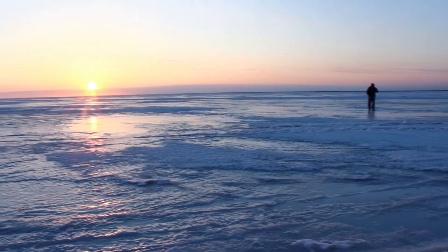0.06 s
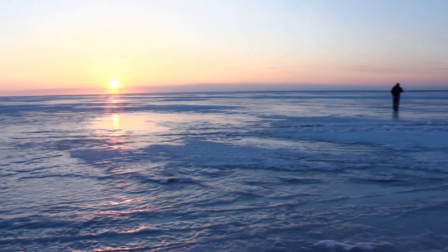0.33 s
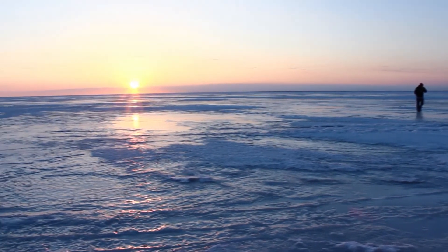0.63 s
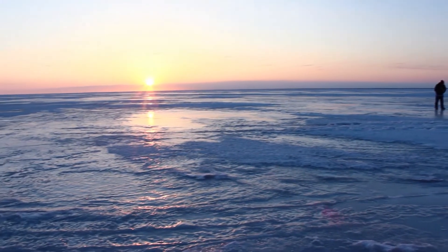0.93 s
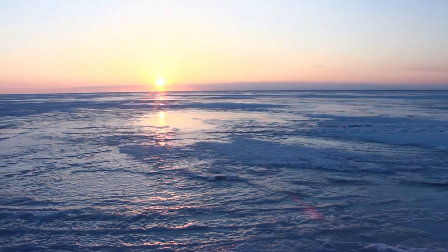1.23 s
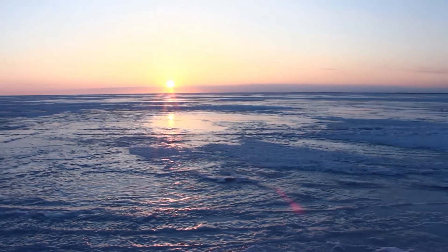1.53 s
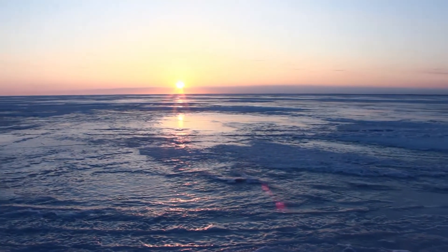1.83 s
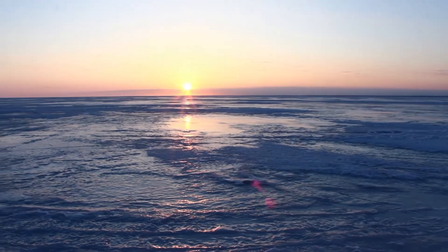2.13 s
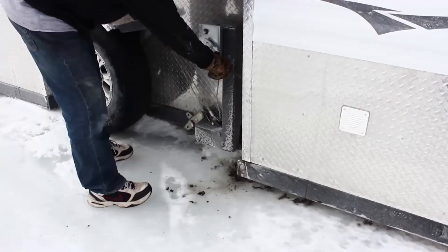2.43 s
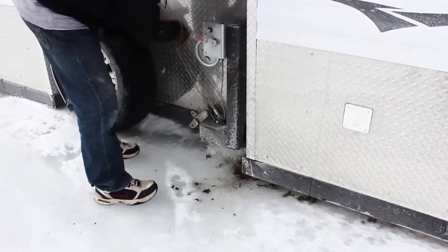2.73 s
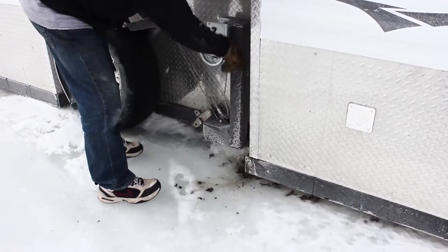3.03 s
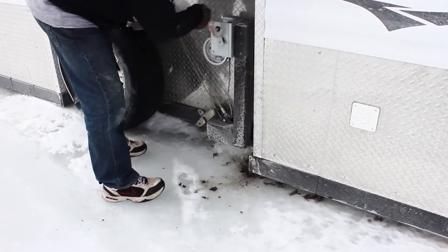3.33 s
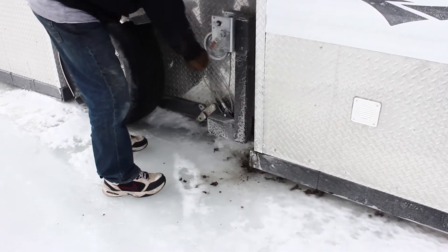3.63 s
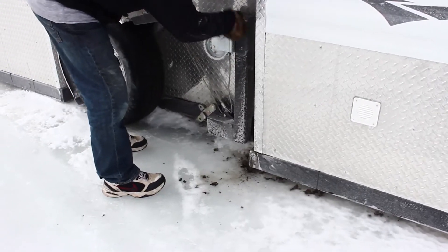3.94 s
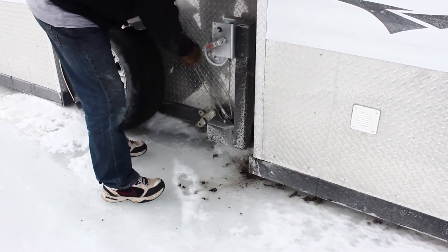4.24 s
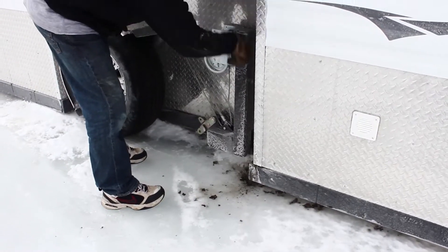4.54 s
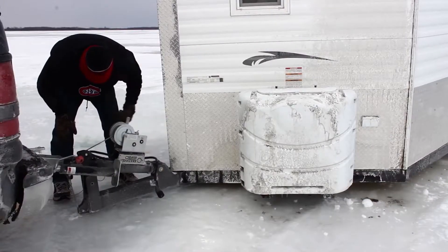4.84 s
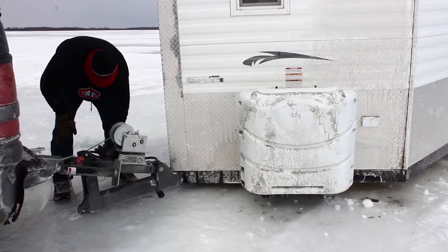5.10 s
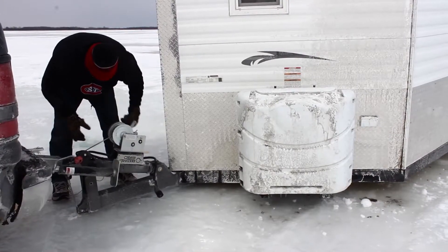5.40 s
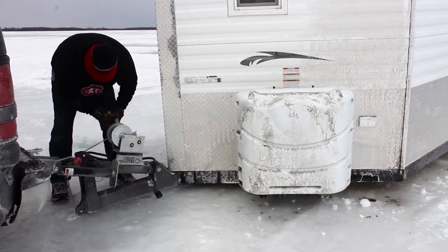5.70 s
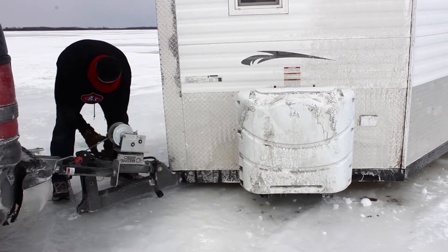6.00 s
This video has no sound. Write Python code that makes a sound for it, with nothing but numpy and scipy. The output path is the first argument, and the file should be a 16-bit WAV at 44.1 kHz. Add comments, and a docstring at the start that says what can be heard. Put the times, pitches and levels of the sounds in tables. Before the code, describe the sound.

After a few faint crunches and knocks outdoors, a hand winch and then a hitch jack rattle loudly with rapid, surging ratchet clicks.

```python
"""A few soft steps and knocks on a frozen lake open the scene. Then the winch of a shelter's wheel lift
is cranked hard, and after it the hitch jack. On each, a pawl drops over the ratchet teeth, faster and
slower with every turn of the handle, and rings the steel housing. The gears rumble in the frame under
the load, and the jack squeaks as it slows."""
import sys
import numpy as np
from scipy import signal
from scipy.fft import rfft, irfft
from scipy.io import wavfile
from scipy.ndimage import uniform_filter1d

SR = 44100
rng = np.random.default_rng(int(sys.argv[2]) if len(sys.argv) > 2 else 0)


def to_wav(s):
    """Save 16-bit WAV."""
    ch = np.atleast_2d(s).T  # columns
    pcm = np.round(np.clip(ch, -1, 1) * 32767)  # PCM
    wavfile.write(sys.argv[1], SR, pcm.astype(np.int16))


N = 276151


def undb(db):
    """Decibels to gain."""
    return 10 ** (np.asarray(db) / 20)


def curve(table, column=1):
    """One column of a table, joined by straight lines in time."""
    rows = np.array(table, float)
    return np.interp(np.arange(N) / SR, rows[:, 0], rows[:, column])


def swells(table, column=2):
    """Gain of bell-shaped swells; each row starts with centre and half length in seconds."""
    t = np.arange(N) / SR
    powers = (undb(row[column]) ** 2 * np.exp(-2 * ((t - row[0]) / row[1]) ** 2) for row in table)
    return np.sqrt(sum(powers))


def add(out, s, sound):
    """Mix a short sound in at s seconds."""
    i = int(np.clip(round(s * SR), 0, N - 1))
    out[i:i + len(sound)] += sound[:N - i]


def body(x, colour, modes=(), ripple_db=0, size=8192):
    """Ring x through a broad EQ, main resonances and a ripple of weak ones, at unit power gain."""
    f = np.arange(size // 2 + 1) * SR / size
    points = np.array(colour, float)
    colour_db = np.interp(np.log(f + 1), np.log(points[:, 0]), points[:, 1])
    ripple = signal.fftconvolve(rng.standard_normal(len(f)), np.hanning(25), "same")
    power = undb(colour_db + ripple_db * ripple / np.std(ripple)) ** 2
    for hz, half_width, db in modes:
        power += undb(db) ** 2 / (1 + ((f - hz) / half_width) ** 2) ** 2
    # folding the cepstrum puts the ring after the hit
    cepstrum = irfft(np.log(power / power.mean()) / 2)
    cepstrum[1:size // 2] *= 2
    cepstrum[size // 2 + 1:] = 0
    return signal.fftconvolve(x, irfft(np.exp(rfft(cepstrum))))[:N]


def grit(per_s, spread_db):
    """Dense tiny impacts of uneven size, rms 1."""
    impacts = rng.standard_normal(N) * (rng.random(N) < per_s / SR)
    impacts *= undb(spread_db * rng.standard_normal(N))
    return impacts / np.std(impacts)


def chatter(envelope, passes=0):
    """A unit-energy burst of tiny rebounds under an envelope; each pass evens out its spectrum."""
    burst = rng.standard_normal(len(envelope)) * envelope
    for _ in range(passes):
        burst *= envelope / np.sqrt(uniform_filter1d(burst ** 2, size=64) + 1e-12)
        spectrum = rfft(burst, 2 * len(envelope))
        burst = irfft(spectrum / (np.abs(spectrum) + 1e-12))[:len(envelope)]
    return burst / np.linalg.norm(burst)


def teeth(speed):
    """Times at which a pawl drops: one for every tooth that the wheel carries past it."""
    t = np.arange(int(speed[0][0] * SR), int(speed[-1][0] * SR)) / SR
    passed = np.cumsum(np.interp(t, *np.transpose(speed))) / SR
    return np.interp(np.arange(int(passed[-1]) + 1), passed, t)


# EQ of the murmur and of the hiss. Each row: frequency in Hz, relative level in dB.
MURMUR_COLOUR = [(20, -28.5), (45, -9), (100, -1), (180, -0.5), (290, 2), (400, -1.5), (500, -1.5),
                 (680, -11), (2000, -18.5), (8000, -66)]
HISS_COLOUR = [(1000, 8), (5000, -1.5), (9000, -3), (15500, -4.5)]
# Fader ride of the bed, dipping briefly after the first clank.
# Each row: time in seconds, murmur and hiss in dB before their trims.
AIR_LEVELS = [(0, -41.5, -53), (.14, -50.5, -49.5), (.54, -39.5, -52), (.9, -47, -49), (1.35, -42, -50),
              (2.08, -51, -53.5), (2.26, -41, -51), (2.305, -47, -60), (2.38, -56, -58),
              (2.48, -48.5, -52.5)]

def lake_air(murmur_trim_db=1, hiss_trim_db=-1):
    """The bed: a low murmur of the open lake and a smooth hiss."""
    murmur = body(rng.standard_normal(N), MURMUR_COLOUR) * undb(curve(AIR_LEVELS) + murmur_trim_db)
    hiss = body(rng.standard_normal(N), HISS_COLOUR) * undb(curve(AIR_LEVELS, column=2) + hiss_trim_db)
    return murmur + hiss


# EQ of the dull rustle and the bright swish. Each row: frequency in Hz, relative level in dB.
RUSTLE_COLOUR = [(200, -26.5), (550, 0.5), (800, -2.5), (1100, -2.5), (1600, -3), (2500, -13), (4500, -18),
                 (15000, -44.5)]
SWISH_COLOUR = [(800, -36.5), (2000, -5), (3500, -2), (4800, -13), (6500, -25.5), (15000, -31)]
# Peaks in the swish. Each row: frequency and half-width in Hz, relative level in dB.
SWISH_MODES = [(2200, 220, 4), (2750, 220, -0.5), (3180, 190, -1), (4290, 99, -2.8)]
# Scuffing moves. Each row: centre and half length in seconds, rustle and swish in dB.
SCUFFS = [(0.015, 0.071, -42.5, -42.5), (.2, 0.29, -48, -60), (.6, .15, -43.5, -51), (.76, 0.087, -47, -52),
          (.95, 0.047, -37.5, -48), (1.07, 0.068, -39, -42.5), (1.165, 0.042, -38, -47),
          (1.29, 0.08, -45.5, -56), (1.62, 0.25, -54.5, -52), (1.9, 0.17, -69, -53),
          (2.18, 0.041, -42, -53), (2.52, 0.061, -49, -53)]

def scuffs(rustle_floor_db=-62, swish_floor_db=-61.5):
    """Shoes and clothes rub in grainy swells over a faint steady floor."""
    rustle = body(grit(4000, 1.5), RUSTLE_COLOUR)
    swish = body(grit(8700, 1.6), SWISH_COLOUR, SWISH_MODES)
    return (rustle * np.hypot(swells(SCUFFS), undb(rustle_floor_db))
            + swish * np.hypot(swells(SCUFFS, column=3), undb(swish_floor_db)))


# EQ of the crunch. Each row: frequency in Hz, relative level in dB.
CRUNCH_COLOUR = [(150, -42), (500, 7.5), (1100, 3.5), (2000, 2.5), (3300, -2), (5000, -15.5), (9000, -26),
                 (15000, -36)]
# Steps and knocks. Each row: start in seconds, thud level in dB, thud pitch in Hz,
# thud decay in seconds, crunch level in dB, crunch decay in seconds.
STEPS = [(0.3113, -14, 425, 0.0043, -27, 0.0023), (0.3145, -7, 294, 0.0024, -23, 0.003),
         (0.418, -32, 243, 0.011, -57, .009), (.615, -34, 507, .008, -35, .01),
         (.714, -21.5, 570, .0054, -40, .008), (0.729, -25, 322, 0.014, -32.5, 0.013),
         (0.83, -22, 203, 0.0046, -33.5, 0.0076), (0.9645, -14.5, 360, 0.013, -6.5, 0.0038),
         (1.078, -23, 196, 0.006, -22, 0.0085), (1.104, -28, 454, .0073, -20.5, 0.0048),
         (1.2355, -34, 157, 0.021, -21.5, .011), (1.325, -29, 202, .017, -54, .01),
         (1.355, -30, 148, .017, -56, .01), (1.403, -19.5, 217, 0.0087, -37, 0.012),
         (2.165, -21.5, 200, 0.0072, -37, .024), (2.194, -24, 163, 0.01, -41, .0095),
         (2.275, -24, 194, .015, -24, 0.013)]

def steps():
    """Each contact is a damped thud and a crunch of frozen grains."""
    t = np.arange(SR // 8) / SR
    thuds, crunch = np.zeros(N), np.zeros(N)
    for s, db, hz, decay_s, crunch_db, crunch_s in STEPS:
        add(thuds, s, undb(db) * np.exp(-t / decay_s) * np.sin(2 * np.pi * hz * t))
        add(crunch, s, undb(crunch_db) * np.exp(-t / crunch_s) * rng.standard_normal(len(t)))
    return thuds + body(crunch, CRUNCH_COLOUR)


# Metal accents. Each row: start in seconds, pitch in Hz, level in dB, decay in seconds.
CLINKS = [(1.237, 4790, -41, .025), (4.294, 4740, -32, .015), (4.56, 4735, -27, .018),
          (4.594, 4735, -28, .018), (4.625, 4735, -27, .012)]

def clinks():
    """Thin metallic pings that fade freely."""
    t, out = np.arange(SR // 4) / SR, np.zeros(N)
    for s, hz, db, decay_s in CLINKS:
        add(out, s, undb(db) * np.exp(-t / decay_s) * np.sin(2 * np.pi * hz * t))
    return out


# Falling chirps. Each row: start and length in seconds, start and end pitch in Hz, level in dB.
SQUEAKS = [(5.651, 0.06, 3560, 3040, -44), (5.728, 0.037, 3950, 3650, -38.5),
           (5.756, 0.023, 2780, 2440, -37)]

def bearing_squeak(waver=0.024, octave_db=-7):
    """The jack's dry bearing sticks and slips in thin, unsteady whistles with their octave."""
    out = np.zeros(N)
    for s, length_s, start_hz, end_hz, db in SQUEAKS:
        n = int(length_s * SR)
        wobble = uniform_filter1d(rng.standard_normal(N), size=80)[:n]
        hz = np.linspace(start_hz, end_hz, n) * (1 + waver * wobble / np.std(wobble))
        phase = 2 * np.pi * np.cumsum(hz) / SR
        whistle = np.sin(phase) + undb(octave_db) * np.sin(2 * phase)
        add(out, s, undb(db) * np.sqrt(np.hanning(n)) * whistle)
    return out


# EQ of the boom. Each row: frequency in Hz, relative level in dB.
BOOM_COLOUR = [(20, -14), (40, -9), (70, -4), (120, -8.5), (180, -7.5), (400, -17.5), (2000, -45)]
# Low swells. Each row: centre and half length in seconds, level in dB.
BOOMS = [(4.7, 0.091, -49), (5.025, 0.057, -33.5), (5.145, 0.033, -37), (5.44, .08, -49), (5.73, 0.15, -35),
         (5.885, 0.064, -30), (6.06, 0.18, -34.5)]

def frame_boom():
    """The shelter's frame booms as it takes weight at the hitch."""
    return body(grit(990, 4.1) * swells(BOOMS), BOOM_COLOUR)


# Heavy pushes on the handles. Each row: centre and half length in seconds, rumble boost in dB.
PUSHES = [(3.02, 0.065, 5.5), (3.23, .06, 4.5), (4.02, 0.059, 2.5), (5.035, 0.038, 3), (5.18, 0.033, 1.5),
          (6.04, .08, 0.5)]

def cranking(speed, db, db_per_doubling, usual_teeth_per_s=60):
    """Gain of the gear rumble over one run: louder at speed and under a heavy push."""
    t = np.arange(N) / SR
    push_db = sum(boost * np.exp(-((t - s) / half_s) ** 2) for s, half_s, boost in PUSHES)
    speed_db = db_per_doubling * np.log2(curve(speed) / usual_teeth_per_s)
    turning = (t >= speed[0][0]) & (t <= speed[-1][0] + .01)
    return undb(db + push_db + speed_db) * uniform_filter1d(turning.astype(float), size=256)


def jolts(clicks, trim_db, decay_s):
    """Gain of the rumble as the gears lurch on by one tooth, more for a stronger click."""
    t, out = np.arange(SR // 4) / SR, np.zeros(N)
    for s, click_db, *_ in clicks:
        add(out, s, undb(trim_db + click_db / 2) * np.exp(-t / decay_s))
    return out


# EQ of the jack's rumble. Each row: frequency in Hz, relative level in dB.
JACK_RUMBLE = [(60, -22), (170, -1.5), (280, -3.5), (420, -2.5), (620, -1.5), (860, -1), (1080, 0.5),
               (1330, -0.5), (2000, -5.5), (3500, -5.5), (6000, -23), (15000, -31)]
# Frame resonances at the hitch. Each row: frequency and half-width in Hz, relative level in dB.
HITCH_FRAME = [(276.4, 20, 7.9), (356, 14, 5), (496, 15, 0.89), (860, 32, 1.8), (990, 16, 1.7),
               (1310, 98, 7.6)]

def jack_gears(run_out_s=.012):
    """Loaded teeth grind and shake the frame at the hitch, running out after each spell of cranking."""
    runs = sum(cranking(speed, db=-26.5, db_per_doubling=4.5) for speed in (JACK_LONG, JACK_SHORT))
    keep = np.exp(-1 / (run_out_s * SR))
    gain = signal.lfilter([1 - keep], [1, -keep], runs)
    gain += jolts(JACK_SINGLES, trim_db=-17.5, decay_s=0.028)
    return body(grit(8000, 2.4) * gain, JACK_RUMBLE, HITCH_FRAME)


# EQ of the winch's rumble. Each row: frequency in Hz, relative level in dB.
WINCH_RUMBLE = [(30, -23), (70, -34), (170, -3.5), (330, 3), (620, -8), (1000, 8), (1250, -8), (1700, 4.5),
                (2600, 0.5), (5000, -11.5), (15000, -20)]
# Frame resonances at the wheel. Each row: frequency and half-width in Hz, relative level in dB.
WHEEL_FRAME = [(181, 49, 2.5), (283, 11, 1), (338, 12, 6), (492.7, 15.6, 7.5), (551, 2.7, 13),
               (665, 7.6, 8), (822, 26, 7.5), (980, 78, 0.5), (1290, 22, 10.5), (1750, 76, -14)]

def winch_gears():
    """Loaded teeth grind and shake the frame at the wheel."""
    gain = cranking(WINCH_SPEED, db=-31, db_per_doubling=9)
    gain += jolts(WINCH_SINGLES[1:], trim_db=-20.5, decay_s=0.012)
    return body(grit(3000, 2.5) * gain, WINCH_RUMBLE, WHEEL_FRAME)


# EQ of the pawl's scrape. Each row: frequency in Hz, relative level in dB.
DRAG_COLOUR = [(200, -12.5), (1000, -12), (4000, -22), (5000, -26), (9500, -27), (15000, -43)]
# Peaks in the scrape. Each row: frequency and half-width in Hz, relative level in dB.
DRAG_MODES = [(1530, 130, 6.5), (2700, 700, -10), (3850, 370, -5.5)]
# Scrapes ahead of a drop. Each row: start and length in seconds, level of each slip in dB.
DRAGS = [(2.209, .058, -22), (2.5, .02, -37.5), (2.554, .008, -21)]

def pawl_drags(slip_every_s=0.011, decay_s=.011):
    """The winch pawl climbs a tooth in a string of small slips."""
    t, out = np.arange(SR // 12) / SR, np.zeros(N)
    for start, length_s, db in DRAGS:
        for s in np.arange(start, start + length_s, slip_every_s):
            add(out, s, undb(db) * np.exp(-t / decay_s) * rng.standard_normal(len(t)))
    return body(out, DRAG_COLOUR, DRAG_MODES)


# Pace of the jack's long run and its short one. Each row: time in seconds, teeth per second.
JACK_LONG = [(4.64, 70.3), (4.71, 61.7), (4.734, 49.9), (4.845, 57.8), (4.89, 65.6), (4.971, 35.1),
             (5.004, 41.8), (5.278, 61.9), (5.318, 53.1), (5.394, 47.9), (5.407, 56.9), (5.511, 60.5),
             (5.553, 32.9)]
JACK_SHORT = [(5.958, 45.0), (6.059, 62.6), (6.111, 42.9)]
# Force on the running pawl, then single drops as the handle stalls and is pushed on.
# Each row: time in seconds, relative levels of the click and the wheel's ring in dB.
JACK_FORCE = [(4.64, -21.5, -29.5), (4.76, -17, -34), (4.81, -19.5, -25.5), (4.9, -17, -27.5),
              (4.94, -21, -28), (5.0, -18.5, -31), (5.068, -15, -25), (5.092, -23, -46),
              (5.2, -16.5, -20.5), (5.225, -23.5, -29), (5.32, -19, -31), (5.37, -21, -39),
              (5.42, -16.5, -27), (5.49, -17, -36), (5.55, -22.5, -26), (5.96, -16.5, -26), (6.0, -19, -42),
              (6.045, -19.5, -20), (6.11, -22, -37)]
JACK_SINGLES = [(5.5928, -22.5, -35), (5.6905, -24.5, -32.5), (5.7785, -23, -38), (5.8629, -15, -21.5),
                (5.9022, -14, -25), (5.9326, -13, -30), (6.153, -38, -59), (6.1694, -28.5, -52),
                (6.2606, -17.5, -43)]

def jack_clicks(click_scatter_db=0.97, ring_scatter_db=3):
    """Cue list of the jack: two runs that follow the force on the pawl, and the single drops."""
    times = np.concatenate([teeth(JACK_LONG), teeth(JACK_SHORT)])
    at, click_db, ring_db = np.transpose(JACK_FORCE)
    chance = rng.standard_normal((len(times), 2))
    clicks = np.interp(times, at, click_db) + click_scatter_db * chance[:, 0]
    rings = np.interp(times, at, ring_db) + ring_scatter_db * chance[:, 1]
    return sorted([*JACK_SINGLES, *zip(times, clicks, rings)], key=lambda row: row[0])


# EQ of the jack's steel housing. Each row: frequency in Hz, relative level in dB.
JACK_COLOUR = [(100, -24), (500, -21), (1000, -21), (1600, -12), (3400, -2.5), (4400, -17.5), (6000, -16),
               (9700, -12), (11200, -23), (15500, -26)]
# Its mid and high resonances. Each row: frequency and half-width in Hz, relative level in dB.
JACK_MODES = [(870, 72, 4), (1345, 78, 0.5), (1468, 33, 4), (1597, 58, -1), (1960, 156, 0.5), (2562, 75, 2),
              (2792, 59, 4.5), (2924, 51, 7), (3186, 73, 1), (3540, 113, 6), (3950, 45, -4)]
JACK_HIGH_MODES = [(5580, 350, -13), (7100, 170, -15), (8730, 140, -8), (8790, 390, -6),
                   (12350, 330, -14.5), (14700, 250, -13)]

def jack_ratchet(click_db=26.5, slip_db=-6, ring_db=6, wheel_hz=4737, wheel_decay_s=0.013):
    """The pawl slips off a tooth and strikes home, sooner at speed; the ratchet wheel rings."""
    t, ring_t = np.arange(1600) / SR, np.arange(SR // 6) / SR
    attack_s = .005
    since = t - attack_s
    rise = np.exp(np.minimum(since, 0) / 0.0019)
    fall = np.hypot(np.exp(-since / 0.0029), undb(-13) * np.exp(-since / 0.01))  # snap and soft tail
    strike, slip = np.where(since < 0, rise, fall), np.exp(-t / 0.0037)
    blows, ring = np.zeros(N), np.zeros(N)
    clicks = jack_clicks()
    gaps = np.diff([row[0] for row in clicks], prepend=clicks[0][0] - .016)
    for (s, db, wheel_db), gap in zip(clicks, gaps):
        lead_s = min(0.16 * gap, 0.006)
        add(blows, s - lead_s, undb(db + click_db + slip_db) * chatter(slip))
        add(blows, s - attack_s, undb(db + click_db) * chatter(strike, passes=1))
        # each strike chokes the ring and restarts it in a new phase
        ring[int(s * SR):] *= .3
        tone = np.sin(2 * np.pi * (wheel_hz * ring_t + rng.random()))
        add(ring, s, undb(wheel_db + ring_db) * np.exp(-ring_t / wheel_decay_s) * tone)
    return body(blows, JACK_COLOUR, JACK_MODES + JACK_HIGH_MODES, ripple_db=0.5) + ring


# Pace of the winch, surging with each push. Each row: time in seconds, teeth per second.
WINCH_SPEED = [(2.6501, 48.1), (2.698, 67.9), (2.767, 48.3), (2.823, 65.4), (2.965, 56.0), (3.087, 42.7),
               (3.246, 87.7), (3.282, 62.2), (3.348, 70.4), (3.449, 54.3), (3.533, 73.6), (3.65, 58.6),
               (3.686, 76.1), (3.846, 67.1), (3.91, 49.6), (4.021, 60.1), (4.161, 33.6), (4.286, 75.5),
               (4.341, 59.3), (4.408, 67.4), (4.5, 50.5), (4.627, 64.6)]
# Slow drops as the handle takes up the load. Each row: start in seconds, relative level in dB.
WINCH_SINGLES = [(2.2711, -5.5), (2.5641, -4.5), (2.5998, -10.5), (2.6268, -14.5)]

def winch_clicks(run_db=-16, scatter_db=0.98):
    """Cue list of the winch: single drops, then a run that the pawl's spring keeps even in level."""
    times = teeth(WINCH_SPEED)
    levels = run_db + scatter_db * rng.standard_normal(len(times))
    return sorted([*WINCH_SINGLES, *zip(times, levels)], key=lambda row: row[0])


# EQ of the winch's steel housing. Each row: frequency in Hz, relative level in dB.
WINCH_COLOUR = [(100, -44.5), (500, -25.5), (1000, -22.5), (1600, -13), (2300, -15), (3600, -9.5),
                (4500, -22), (7000, -28), (11000, -29), (15500, -49.5)]
# Its resonances. Each row: frequency and half-width in Hz, relative level in dB.
WINCH_MODES = [(1008, 25, -8), (1662, 130, -8.5), (1986, 15, -6.5), (2240, 18, -14), (2464, 28, -9),
               (2787, 40, 1), (3136, 63, -1), (3393, 58, 0), (3706, 52, -1.5), (3810, 22, -5.5),
               (4050, 55, -7), (4705, 28, -13.5), (5520, 110, -18), (8250, 54, -14), (9140, 110, -18),
               (9550, 41, -15), (12780, 110, -18), (13250, 110, -30), (14750, 360, -20.5)]
# Free ring of the pawl. Each row: pitch in Hz, relative level in dB, seconds to fade by 60 dB.
PAWL_RING = [(813, -5, .33), (2159, 1, .18), (4743, 0, .16), (9135, -8, .52), (14640, -15, .3)]

def winch_ratchet(hold_s=0.00475, decay_s=0.00472, alike=0.55, click_db=26.5, ring_db=-33,
                  clank_hz=1720, clank_db=-4, snap_db=5, snap_s=0.0041, usual_rest_s=0.01):
    """The pawl chatters much alike on each tooth, ringing the housing, with a short 1.7 kHz clank."""
    t = np.arange(1400) / SR
    envelope = np.exp(-np.maximum(t - hold_s, 0) / decay_s)
    usual = chatter(envelope, passes=6)
    clank = np.exp(-t / 0.0032) * np.sin(2 * np.pi * clank_hz * t)
    blows, ring = np.zeros(N), np.zeros(N)
    clicks = winch_clicks()
    rests = np.diff([row[0] for row in clicks], append=clicks[-1][0] + 0.08)
    for (s, db), rest, rest_before in zip(clicks, rests, np.roll(rests, 1)):
        burst = np.sqrt(alike) * usual + np.sqrt(1 - alike) * chatter(envelope)
        # a harder drop or a longer rest sharpens the attack
        snap = min(undb(db + snap_db) * (rest_before / usual_rest_s) ** 2, 1.2)
        burst *= 1 + snap * np.exp(-t / snap_s)
        add(blows, s, undb(db + click_db) * burst / np.linalg.norm(burst))
        add(ring, s, undb(db + clank_db) * clank)
        # the pawl rings on until the next tooth lifts it
        free_t = np.arange(int(rest * SR)) / SR
        partials = sum(undb(level - 60 * free_t / t60) * np.sin(2 * np.pi * hz * free_t)
                       for hz, level, t60 in PAWL_RING)
        add(ring, s, undb(db + ring_db) * partials)
    return body(blows, WINCH_COLOUR, WINCH_MODES, ripple_db=3.0) + ring


def scene():
    """A mono mix in the open, with no room around it."""
    backdrop = lake_air() + scuffs() + steps() + clinks()
    jack = bearing_squeak() + frame_boom() + jack_gears() + jack_ratchet()
    winch = winch_gears() + pawl_drags() + winch_ratchet()
    return (backdrop + jack + winch)[None]


def record(dry, low_cut_hz=42, top_hz=15800):
    """Nothing sounds below about 40 Hz; the hardest clanks overload the microphone, and the top is cut off."""
    low_cut = signal.butter(2, low_cut_hz, "high", fs=SR, output="sos")
    high_cut = signal.ellip(10, .2, 70, top_hz, fs=SR, output="sos")
    clipped = np.clip(signal.sosfilt(low_cut, dry), -1, 1)
    return signal.sosfilt(high_cut, clipped)


dry = scene()
out = record(dry)
to_wav(out)
```